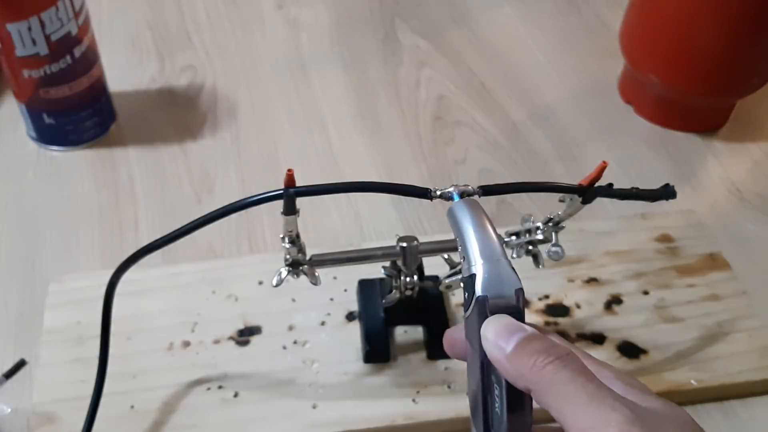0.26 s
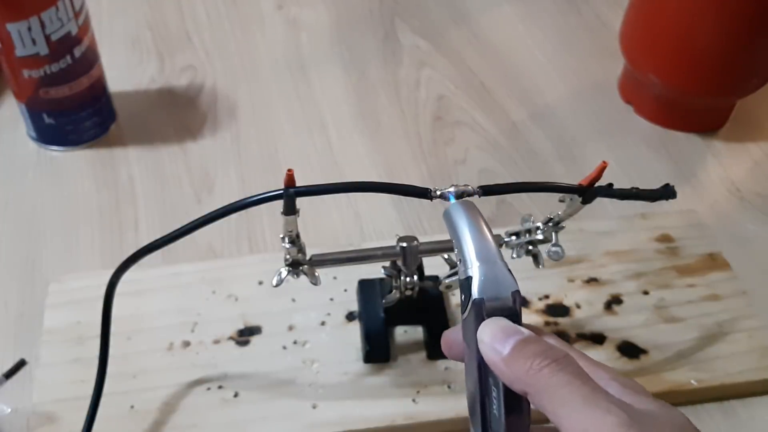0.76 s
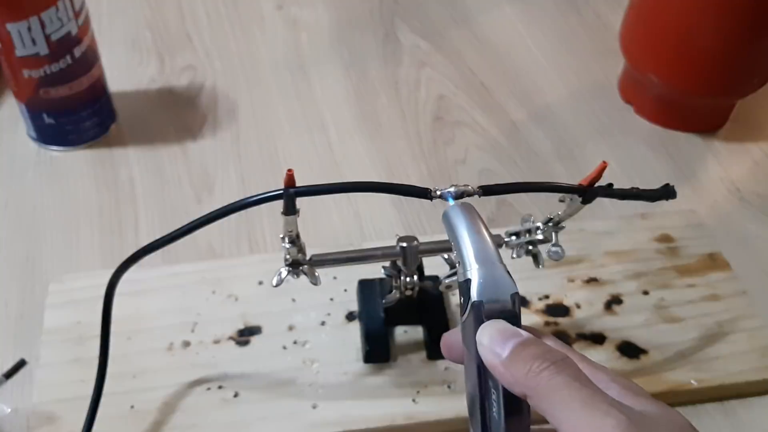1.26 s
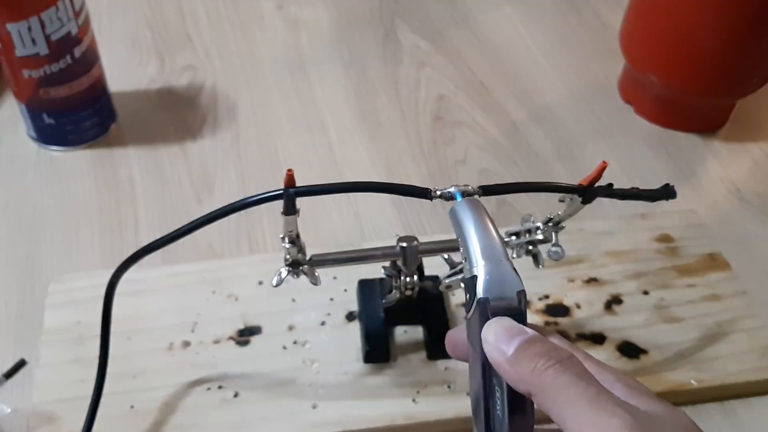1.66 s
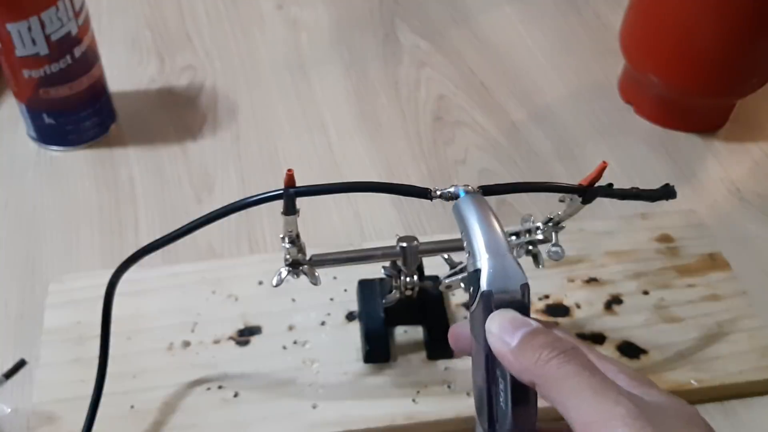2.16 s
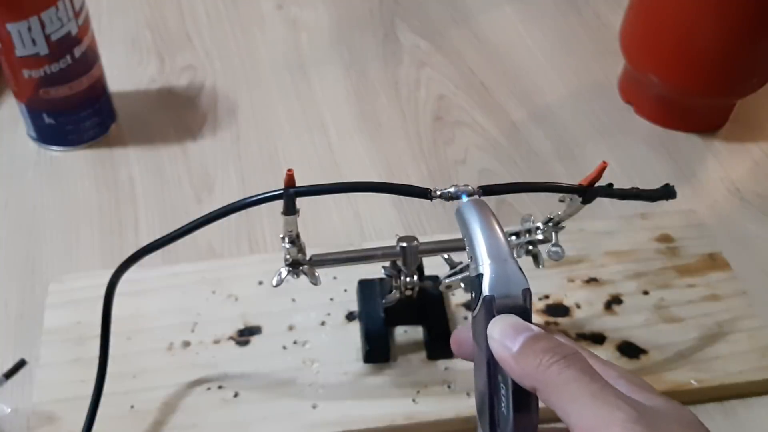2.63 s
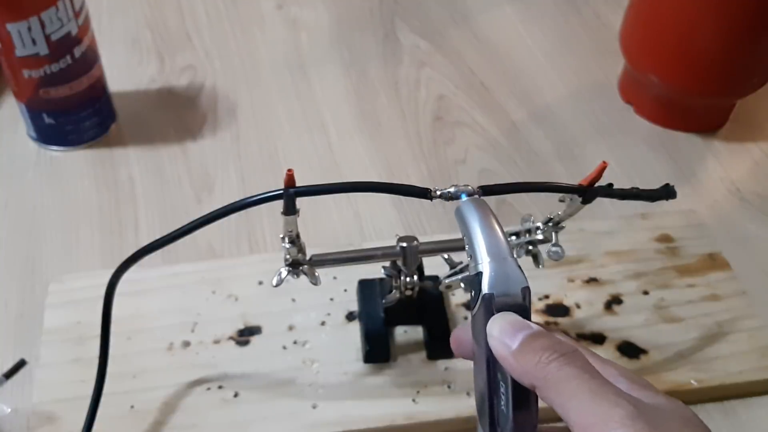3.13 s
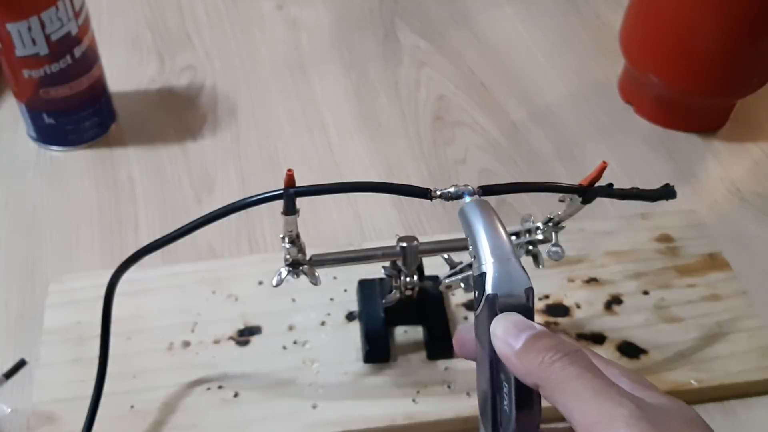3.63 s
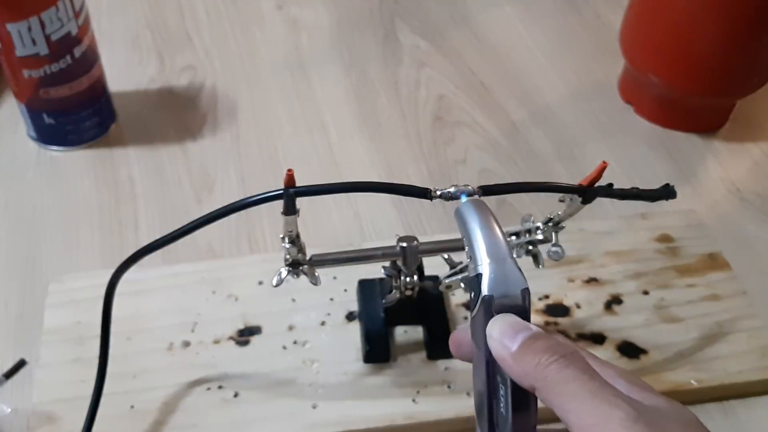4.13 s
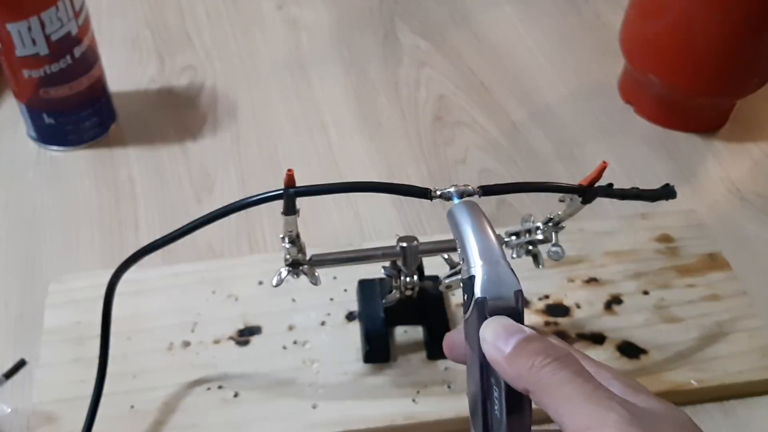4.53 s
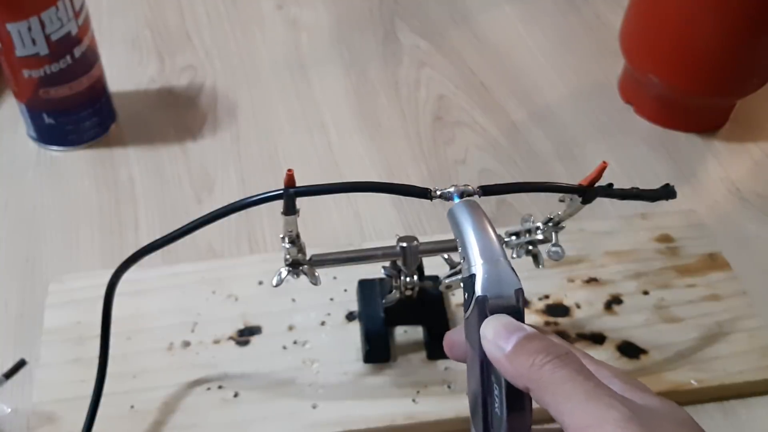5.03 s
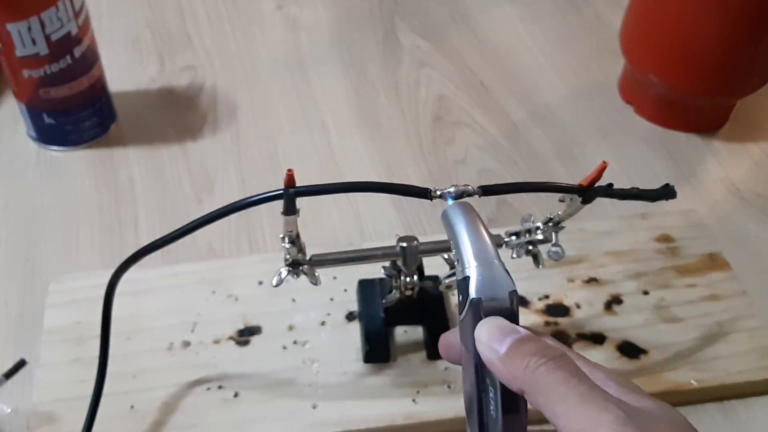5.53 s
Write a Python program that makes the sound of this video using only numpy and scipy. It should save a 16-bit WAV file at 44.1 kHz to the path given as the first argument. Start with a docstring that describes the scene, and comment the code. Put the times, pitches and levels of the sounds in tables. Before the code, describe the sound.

A small gas torch hisses steadily up close indoors, with a few faint soft wooden thuds near the end.

```python
"""A small gas torch burns on a wooden bench close to a stereo microphone.
Its turbulent jet is flickering noise; nozzle, bench and clamp colour it, and each microphone port hears
its own peaks and notches. Below lie a lumpy room rumble of shaped noise, which grows late, and a mains hum
made of one wavering sine. A few soft thuds are decaying wood modes with a short noise echo."""
import sys
import numpy as np
from scipy import signal
from scipy.fft import rfft, irfft
from scipy.io import wavfile
from scipy.ndimage import uniform_filter1d

SR = 44100
rng = np.random.default_rng(int(sys.argv[2]) if len(sys.argv) > 2 else 0)


def persist_wave(psi):
    """Save psi, clipped to +-1, as 16-bit WAV."""
    counts = np.round(np.clip(psi, -1, 1) * 32767).astype(np.int16)
    wavfile.write(sys.argv[1], SR, np.atleast_2d(counts).T)


N = 254986


def gain_of(db):
    """Decibels to amplitude."""
    return 10 ** (np.asarray(db) / 20)


def evened(values):
    """Scales to rms 1."""
    return values / np.sqrt(np.mean(abs(values) ** 2) + 1e-20)


def read(points, hz):
    """Reads a spectrum on a log-frequency axis."""
    f, value = np.transpose(points)
    return np.interp(np.log(hz + 1), np.log(f + 1), value)


def bells(modes, hz):
    """Sum in dB of bell-shaped peaks and notches."""
    return sum(db / (1 + (2 * (hz - f) / width) ** 2) for f, width, db in modes)


def causal(db):
    """Complex gain whose phase follows from the colour (minimum phase), without any extra phase turns."""
    log_gain = np.log(gain_of(db))
    mirrored = np.r_[log_gain, log_gain[-2:0:-1]]
    phase = -signal.hilbert(mirrored).imag[:len(db)]
    return np.exp(log_gain + 1j * phase)


def drift(count, top_hz, step_s):
    """Slow wandering of rms 1: sines of random phase, stronger at low rates."""
    t = np.arange(count) * step_s
    rates = np.geomspace(top_hz / 12, top_hz, 30)
    return evened(sum(np.sin(2 * np.pi * (f * t + rng.random())) / np.sqrt(f) for f in rates))


def room():
    """Low rumble: noise shaped in time and frequency, mostly alike in both ports."""
    # Relative colour of the rumble: f/Hz, level per Hz/dB
    rumble_colour = [(12, -53), (20, -15), (33, -12), (53, -29), (57, -37), (68, -11.5), (107, 2.5),
                     (129, -8), (145, -5.5), (194, -5), (427, -17), (472, -13), (620, -37), (810, -37),
                     (1360, -120)]
    likeness, pan_db = 0.8, 3  # left-right correlation; left minus right
    start_db, swell_rms_db = -67.5, 1.4
    middle_s, rise_s, rise_db = 5.37, 0.21, 3.4  # the rumble grows late
    size, hop = 2048, 512
    frames, hz = N // hop + 5, np.fft.rfftfreq(size, 1 / SR)
    a, b, c, d, lumps = rng.standard_normal((frames, len(hz), 5)).T
    lumps = uniform_filter1d(lumps, size=4, axis=0)  # smooth over frequency
    lumps = evened(uniform_filter1d(lumps, size=5, axis=1))  # smooth over time
    left = a + 1j * b
    right = likeness * left + np.sqrt(1 - likeness ** 2) * (c + 1j * d)
    swell_db = swell_rms_db * drift(frames, 1.96, hop / SR)
    shape_db = read(rumble_colour, hz)[:, None] + 1.7 * lumps + swell_db
    spectra = np.array([left, right]) * gain_of(shape_db)
    sound = evened(signal.istft(spectra, nperseg=size, noverlap=size - hop)[1][:, :N])
    level_db = start_db + rise_db * (1 + np.tanh((np.arange(N) / SR - middle_s) / rise_s)) / 2
    return gain_of(level_db) * sound * gain_of([[pan_db / 2], [-pan_db / 2]])


def hum():
    """A mains tone: one sine that wavers a little in pitch and level, alike in both ports."""
    pitch_hz, waver_rms_hz = 119.3, 2.3
    level_db, swell_rms_db = -74.5, 1.5  # level as rms
    step = 256
    coarse = np.arange(N // step + 2)
    wobble, swell = (np.interp(np.arange(N) / step, coarse, drift(len(coarse), 8., step / SR))
                     for _ in range(2))
    phase = 2 * np.pi * np.cumsum(pitch_hz + waver_rms_hz * wobble) / SR
    return np.sqrt(2) * gain_of(level_db + swell_rms_db * swell) * np.sin(phase)


def thuds():
    """Soft knocks on wood: each rings the modes near its own pitch, with a gentle start and a room echo."""
    # Knocks: t/s, strike level/dB, pitch struck most/Hz, reach (10 dB weaker)/octaves,
    # rise time constant/cycles, left minus right/dB
    knocks = [(3.308, -47, 186, 0.15, 4, 6), (5.1295, -47.5, 170, 1.5, .6, 5),
              (5.174, -46.5, 450, 1.3, .8, 3), (5.3395, -52, 620, 0.9, .6, 2.1)]
    # Modes the bench rings with: f/Hz, relative level/dB, t60/s
    wood = [(112, 3, .17), (186, 0, .07), (250, 1, .035), (340, -2, .03), (458, 0, .027), (555, 2.5, .024),
            (660, -1, .016), (770, -3, .014)]
    echo_db, echo_t60_s = -1.5, .14
    out = np.zeros((2, N))
    for start_s, db, centre_hz, reach, rise, pan_db in knocks:
        t = np.clip(np.arange(N) / SR - start_s, 0, None)
        ring = np.zeros(N)
        for hz, mode_db, t60 in wood:
            off_pitch_db = 10 * (np.log2(hz / centre_hz) / reach) ** 2
            fade = gain_of(db + mode_db - off_pitch_db - 60 * t / t60)
            onset = 1 - np.exp(-t * hz / rise)
            ring += fade * onset * np.sin(2 * np.pi * hz * t)
        out -= ring * gain_of([[pan_db / 2], [-pan_db / 2]])
    t = np.arange(SR // 4) / SR
    tail = rng.standard_normal((2, len(t))) * gain_of(-60 * t / echo_t60_s) * (t > .006)
    tail /= np.linalg.norm(tail[0])
    return out + gain_of(echo_db) * signal.fftconvolve(out, tail, axes=1)[:, :N]


def jet():
    """Three streams of turbulent noise whose level flutters across all bands and in drifting patches."""
    treble_db = -1.5  # tilt that sets in around 6 kHz
    size, hop = 256, 64
    frames, hz = N // hop + 9, np.fft.rfftfreq(size, 1 / SR)
    real, imag = rng.standard_normal((frames, len(hz), 3, 2)).T
    patches = rng.standard_normal((frames, len(hz))).T
    patches = uniform_filter1d(patches, size=8, axis=0)  # smooth over frequency
    patches = evened(uniform_filter1d(patches, size=24, axis=1))  # smooth over time
    treble = (1 / (1 + (6000 / (hz + 1)) ** 4))[:, None]
    flutter_db = 0.086 * drift(frames, 60., hop / SR)
    # the patches flicker more strongly in the treble
    field_db = treble * treble_db + flutter_db + (0.48 + .6 * treble) * patches
    spectra = (real + 1j * imag) * gain_of(field_db)
    return signal.istft(spectra, nperseg=size, noverlap=size - hop)[1][:, :N]


def ripple(hz, t60, db):
    """Fine random comb of many weak late reflections, in dB, with rms depth db."""
    t = np.arange(2 * len(hz) - 2) / SR
    tail = rng.standard_normal(len(t)) * gain_of(-60 * t / t60) * (t > .004)
    return db * evened(rfft(tail).real)


def torch():
    """The jet reaches each port by its own path, shifting as the hand sways; diffuse sound fills notches."""
    # Relative colour of the whole hiss: f/Hz, level/dB
    jet_colour = [(200, -41.9), (550, -18.0), (700, -14.2), (800, -12.3), (1050, 0.1), (2000, -3.0),
                  (3500, -3.6), (4300, -9.6), (5500, -8.6), (6800, -12.7), (7600, -20.2), (10000, -22.3),
                  (12000, -27.0), (15600, -24.9)]
    # Relative colour of its diffuse part: f/Hz, level/dB
    diffuse_colour = [(200, -46.4), (550, -21.5), (800, -17.2), (1050, -14.3), (2000, -12.1), (3500, -13.3),
                      (4300, -15.8), (5500, -14.6), (6800, -18.8), (7600, -25.3), (10000, -25.7),
                      (12000, -29.2), (15600, -27.4)]
    # Peaks and notches that both ports hear: f/Hz, width/Hz, level/dB
    bench = [(712, 24, 5.5), (733, 16, -4.0), (745, 90, 1.2), (845, 50, -6.5), (888, 45, 3.0),
             (925, 28, -4.0), (968, 30, 2.0), (995, 26, -4.0), (1045, 50, 1.5), (1158, 34, 3.6),
             (1351, 109, -2.7), (1357, 18, -3.0), (1385, 28, 9.0), (1488, 38, -3.1), (1648, 72, 5.7),
             (1800, 40, 2.0), (1870, 90, -7.0), (2200, 346, 3.0), (2415, 25, -3.0), (2535, 31, -8.0),
             (2945, 78, 5.5), (3026, 683, -5.8), (2650, 35, 2.5), (2680, 25, -4.0), (2880, 40, -3.0),
             (3058, 35, -3.5), (3190, 35, 3.0), (3250, 70, -2.5), (3541, 497, 6.4), (3550, 30, -2.5),
             (3630, 90, 2.5), (4127, 578, -3.7), (4345, 75, -9.0), (4465, 30, 2.0), (4501, 324, 5.9),
             (4548, 55, -9.0), (4610, 35, 4.0), (4958, 118, 5.0), (5080, 50, -3.0), (5328, 63, -4.9),
             (5965, 40, -3.5), (6050, 30, -4.0), (6145, 70, 4.0), (7180, 60, 3.0), (7321, 102, -6.1),
             (7721, 83, -6.1), (8044, 365, 3.9), (8656, 93, -3.2), (8772, 60, -3.4), (9408, 294, 4.3),
             (9824, 258, -3.2), (12282, 347, -3.7), (12572, 301, 3.6), (13658, 262, 3.7)]
    # Peaks and notches of the left port alone: f/Hz, width/Hz, level/dB
    left_port = [(635, 93, 3.9), (780, 40, -2.5), (1225, 30, -3.0), (1316, 86, -5.9), (1435, 135, 3.2),
                 (1503, 46, -5.5), (1752, 162, 5.8), (2239, 28, -5.9), (2367, 141, 4.1), (2434, 83, -4.3),
                 (2575, 53, 4.4), (2667, 103, 4.8), (2698, 53, -9.0), (3047, 29, -4.4), (3401, 149, 3.7),
                 (3977, 57, -6.2), (4670, 152, 4.3), (5220, 205, 6.1), (5933, 58, -4.8), (6116, 170, 8.6),
                 (6641, 97, -1.8), (6839, 207, 6.5), (6846, 50, -9.3), (7066, 62, -3.3), (7621, 112, -4.0),
                 (9541, 28, -2.9), (9581, 255, 3.0), (11744, 900, 3.2), (12721, 577, 6.4),
                 (15228, 900, 3.2)]
    # Peaks and notches of the right port alone: f/Hz, width/Hz, level/dB
    right_port = [(630, 116, -5.3), (759, 25, 4.7), (927, 25, -4.3), (1120, 30, -3.0), (1247, 45, 4.3),
                  (1328, 36, 7.9), (1360, 22, -4.0), (1427, 25, -2.3), (1442, 240, -2.6), (1510, 61, 5.0),
                  (1654, 111, 2.8), (1723, 149, -7.7), (1825, 35, -4.0), (2316, 235, 2.2), (2378, 80, -5.7),
                  (2438, 259, 1.7), (2534, 157, -3.2), (3019, 31, 5.3), (3264, 30, -8.0), (3550, 102, -5.3),
                  (3750, 217, 3.0), (3847, 82, -8.4), (3935, 163, 4.7), (4245, 45, -3.0), (4619, 83, -5.2),
                  (5191, 107, -6.8), (6067, 900, -4.1), (6736, 283, 3.7), (8201, 328, 2.3),
                  (10785, 828, -3.7), (12662, 900, -5.9), (15359, 900, -5.6)]
    # Left notches where an echo outweighs the direct sound, so the phase makes a full turn: f/Hz, width/Hz
    left_turns = [(3977, 50), (4340, 70)]
    # The same for the right port: f/Hz, width/Hz
    right_turns = [(1860, 110), (5310, 80), (6150, 260), (9750, 200)]
    # Depth of the dense random ripple, greatest near 6 kHz: f/Hz, share of full depth
    ripple_depth = [(1000, .15), (4500, .3), (6000, .6), (9000, .48)]
    # Hand sway that steers the crossfade between shifted colours: t/s, shift/%
    sway = [(0, -.2), (1.8, -0.18), (2.8, 0.088), (3.9, 0.19), (4.7, -.05), (5.8, -.15)]
    sway_reach = .35  # %, shift at either end of the crossfade
    hiss_db, right_lag_ms = -45.5, 0.013

    size = 2 ** 18
    coarse, hz = np.fft.rfftfreq(16384, 1 / SR), np.fft.rfftfreq(size, 1 / SR)
    source, left_diffuse, right_diffuse = rfft(jet(), size)
    fine = read(ripple_depth, coarse)
    shared_db = read(jet_colour, coarse) + bells(bench, coarse)
    shared_db = shared_db + fine * ripple(coarse, t60=0.18, db=1.0)
    shift = np.interp(np.arange(N) / SR, *np.transpose(sway))
    blend = np.clip((1 + shift / sway_reach) / 2, 0, 1)
    out = []
    for port, turns, lag_ms, diffuse in ((left_port, left_turns, 0, left_diffuse),
                                         (right_port, right_turns, right_lag_ms, right_diffuse)):
        total_db = shared_db + bells(port, coarse) + fine * ripple(coarse, t60=0.031, db=6.0)
        path = causal(total_db) * np.exp(-2j * np.pi * coarse * lag_ms / 1000)
        for f, width in turns:
            path = path * (coarse - f + .5j * width) / (coarse - f - .5j * width)
        # diffuse share of the power
        share = np.clip(gain_of(2 * (read(diffuse_colour, coarse) - total_db)), 0, 1)
        direct_gain, diffuse_gain = path * np.sqrt(1 - share), abs(path) * np.sqrt(share)
        ends = []
        for stretch in (1 + sway_reach / 100, 1 - sway_reach / 100):  # peaks lower, then higher
            slid = hz * stretch
            spectrum = source * np.interp(slid, coarse, direct_gain)
            spectrum = spectrum + diffuse * np.interp(slid, coarse, diffuse_gain)
            ends.append(irfft(spectrum, size)[:N])
        low, high = ends
        out.append((1 - blend) * low + blend * high)
    return gain_of(hiss_db) * evened(np.array(out))


def scene():
    """Torch, room, hum and thuds."""
    return torch() + room() + hum() + thuds()


def record(dry):
    """The band limit of the recorder: a steep linear-phase low-pass."""
    edge_hz = 15735
    lowpass = signal.firwin(1023, edge_hz, window=("kaiser", 9), fs=SR)
    return signal.oaconvolve(dry, lowpass[None], "same")


dry = scene()
out = record(dry)
persist_wave(out)
```